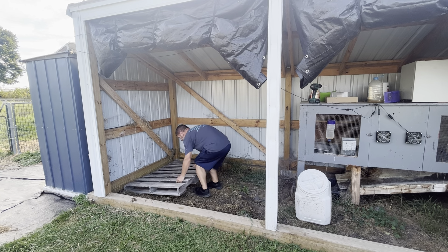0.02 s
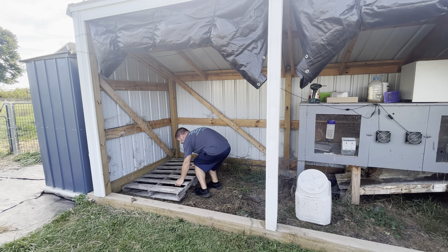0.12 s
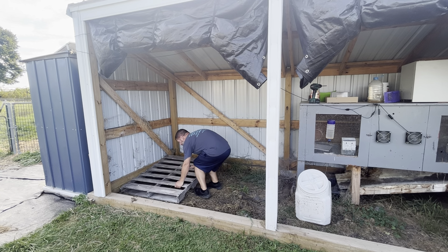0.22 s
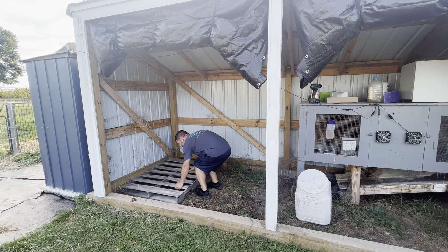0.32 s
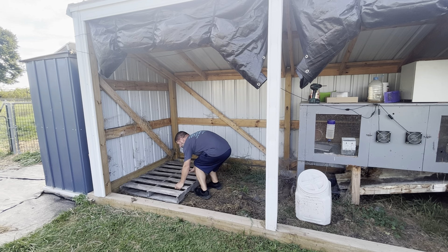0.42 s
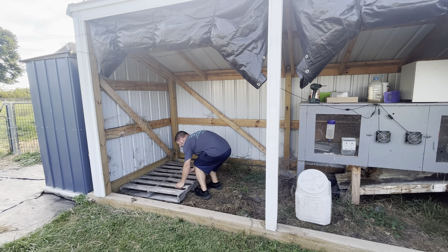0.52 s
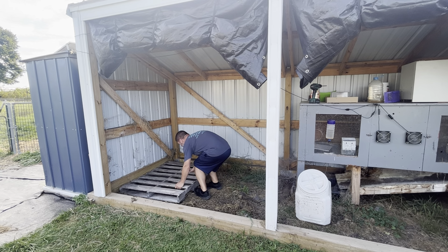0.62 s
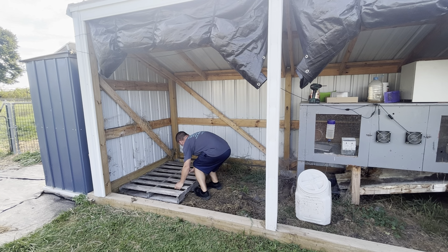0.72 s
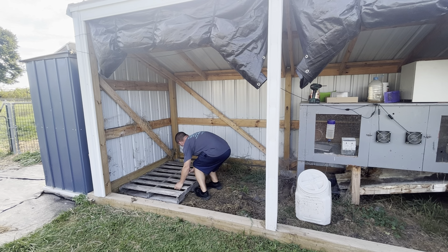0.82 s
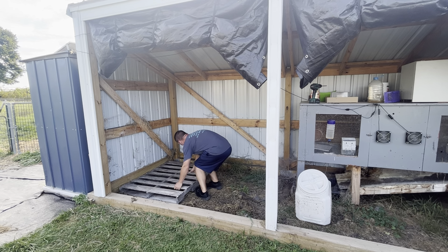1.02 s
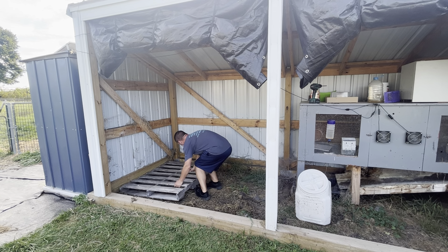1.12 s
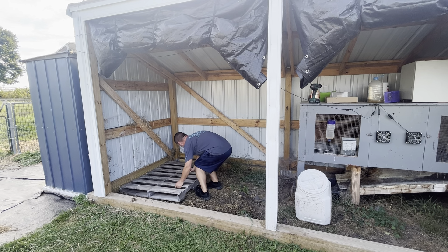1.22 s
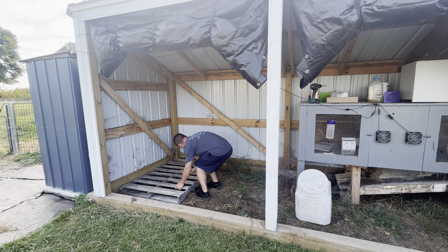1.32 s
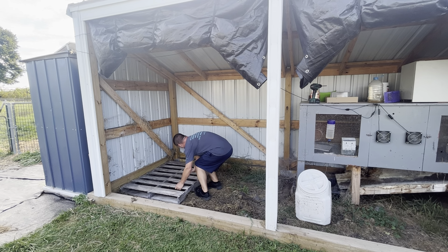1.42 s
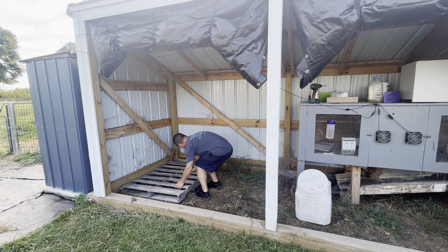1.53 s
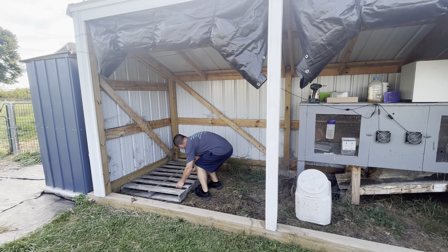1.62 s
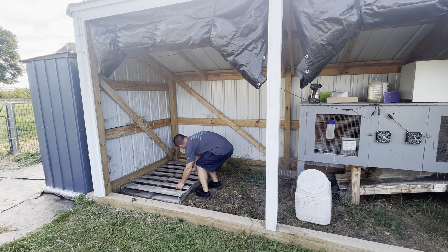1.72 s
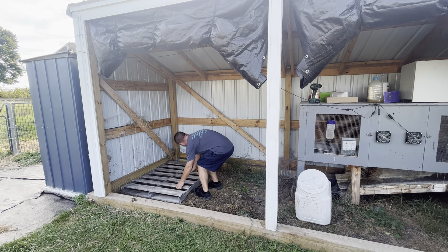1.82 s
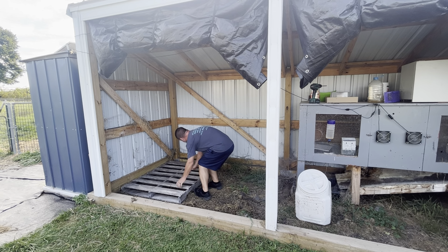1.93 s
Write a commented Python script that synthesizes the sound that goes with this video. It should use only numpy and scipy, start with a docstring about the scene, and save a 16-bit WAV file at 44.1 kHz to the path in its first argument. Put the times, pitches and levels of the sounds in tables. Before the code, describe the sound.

In an open metal shed, a wooden pallet lands with a hollow, gritty thump. Two softer nudges and a sharp board clack follow, while a faint cricket chirps on the left and other insects tick on the right.

```python
"""In an open, metal-walled shed, a wooden pallet drops onto the dirt floor: its frame and boards ring,
grit crunches, the slats rattle and the walls boom. It is nudged twice, scuffing over dry grass, and a
loose board clacks after the second nudge. Outdoors a cricket chirps with its wings on the left, while
another insect ticks over a steady chorus on the right and the air wavers softly."""
import sys
import numpy as np
from scipy import signal
from scipy.fft import rfft, irfft, next_fast_len
from scipy.io import wavfile

SR = 44100
rng = np.random.default_rng(int(sys.argv[2]) if len(sys.argv) > 2 else 0)


def master(y):
    """Save y as 16-bit WAV."""
    cut = np.clip(np.atleast_2d(y).T, -1, 1)
    pcm = np.round(cut * 32767)  # scale
    wavfile.write(sys.argv[1], SR, pcm.astype(np.int16))


N = 85995
T = np.arange(N) / SR
FREQS = np.fft.rfftfreq(N, 1 / SR)

# The pallet meets the ground. Each row: start in seconds, force in dB, treble cutoff in Hz,
# push on the walls in dB, push on the grit in dB.
IMPACTS = [(0.003, -40.5, 600, -51, -47), (0.2449, -1, 1320, 0.5, -1.5), (0.2641, -17, 1500, -36, -10),
           (0.2838, -19.5, 2000, -5.5, -11), (0.3000, -26, 900, -9, -26), (0.3369, -25.5, 770, -6.5, -16.5),
           (0.545, -25, 390, -25, -20), (0.590, -25.5, 430, -33, -23), (1.1576, -15.5, 350, -22, -19),
           (1.232, -24.5, 288, -30, -25), (1.6210, -10.5, 480, -11, -11.5)]


def undb(db):
    """Decibels to gain."""
    return 10 ** (np.asarray(db) / 20)


def lookup(table, hz, column=1):
    """Read a table's column at a frequency, on a log axis."""
    rows = np.array(table, float)
    return np.interp(np.log(hz), np.log(rows[:, 0]), rows[:, column])


def pan(db):
    """Stereo gains for a level difference; positive leans left."""
    return undb(np.array([[db], [-db]]) / 2)


def noise(spectrum):
    """Stereo noise of unit level with the given spectrum."""
    y = irfft(rfft(rng.standard_normal((2, N))) * spectrum, N)
    return y / y.std(axis=-1, keepdims=True)


def wander(hz):
    """A random drift of unit spread, moving at up to about hz."""
    knots = rng.standard_normal(N // 20)
    return np.sqrt(3 / 2) * np.interp(2 * hz * T, np.arange(len(knots)), knots)


def bands():
    """Half-octave stereo noises, narrow in the bass and at the very top, wide in between."""
    # Stereo image. Each row: frequency in Hz, likeness of left and right from 0 to 1.
    likeness = [(60, 0.95), (150, 0.95), (300, 0.51), (600, 0), (1500, 0.32), (4000, 0.28), (8000, 0),
                (14000, 0.94)]
    size = next_fast_len(N, True)
    octaves = np.log2(np.maximum(np.fft.rfftfreq(size, 1 / SR), 1))
    white = rfft(rng.standard_normal((2, size)))
    for hz in 25 * 2 ** (np.arange(20) / 2):
        away = np.minimum(abs(octaves - np.log2(hz)) * 2, 1)
        y = irfft(white * np.cos(away * np.pi / 2) ** 2, size)[:, :N]
        mid, side = y / y.std(axis=-1, keepdims=True)
        like = lookup(likeness, hz)
        yield hz, np.sqrt((1 + like) / 2) * mid + np.sqrt((1 - like) / 2) * side * np.array([[1], [-1]])


def fade(t60):
    """Decay by 60 dB in t60 seconds."""
    return np.exp(-np.log(1000) * T / t60)


def swell(age, length):
    """A half-sine rise and fall."""
    return np.sin(np.pi * np.clip(age / length, 0, 1))


def impulse(start, db):
    """One instant push."""
    return undb(db) * (np.arange(N) == int(start * SR))


def through(x, response):
    """Play a signal through an impulse response."""
    return signal.fftconvolve(np.atleast_2d(x), np.atleast_2d(response), axes=-1)[:, :N]


def ring(modes):
    """Damped modes of alternating sign."""
    return sum((-1) ** k * undb(db) * fade(t60) * np.sin(2 * np.pi * hz * T)
               for k, (hz, db, t60) in enumerate(modes))


def dense_ring(power, table, cutoff_hz=np.inf):
    """Modes too dense to tell apart: pushes feed noise that dies at its own pace in each band."""
    total = 0
    for hz, band in bands():
        retained = np.exp(-2 * np.log(1000) / (lookup(table, hz, column=2) * SR))
        drive = power / (1 + (hz / cutoff_hz) ** 6)
        energy = signal.lfilter([1], [1, -retained], drive + 1e-18)
        bass_rolloff = min(hz / table[0][0], 1) ** 2
        total += band * np.sqrt(energy) * undb(lookup(table, hz)) * bass_rolloff
    return total


def air(waver_db=2.2):
    """A soft bed of outdoor air, each band wavering on its own."""
    # Colour of the air. Each row: frequency in Hz, level in dB per half octave.
    colour = [(25, -89), (50, -64), (90, -51.5), (130, -58), (190, -58.5), (350, -66.5), (650, -76.5),
              (1000, -73.5), (1500, -69.5), (3000, -82.5), (6000, -77), (10000, -74.5), (14000, -86)]
    return sum(band * undb(lookup(colour, hz) + waver_db * wander(3.8)) for hz, band in bands())


def chorus():
    """Distant insects blur into narrow, fluttering bands of noise."""
    # Each row: centre in Hz, width in Hz, level in dB, pan in dB, flutter in dB.
    swarms = [(4864, 360, -61, 5, 1), (7640, 260, -62.5, -6, 2.5), (8256, 290, -58, -6, -3.5),
              (8840, 510, -60, -12, 1)]
    total = 0
    for hz, width, db, pan_db, flutter_db in swarms:
        shimmer = noise(np.exp(-((FREQS - hz) / width) ** 2 / 2))
        total += shimmer * undb(db + flutter_db * wander(35)) * pan(pan_db)
    return total


def scuffs(grain_db=2.0):
    """The pallet drags over dry grass in grainy swishes."""
    # Each row: centre in seconds, half-length in seconds, gain in dB.
    swishes = [(0.01, 0.025, -8), (0.139, 0.068, -0.5), (0.262, 0.029, 1.5), (0.288, 0.035, 3.5),
               (0.398, 0.017, 7), (0.489, 0.033, 0), (0.56, 0.085, -6), (0.905, 0.033, -3.5),
               (1.102, 0.091, -10), (1.311, 0.037, -2.5), (1.587, 0.15, -9.5)]
    # Colour of the grass. Each row: frequency in Hz, level in dB per half octave.
    colour = [(150, -98), (400, -61.5), (1000, -61.5), (2000, -59), (4000, -59), (6000, -60), (10000, -62),
              (14000, -63)]
    effort = sum(undb(db) * np.exp(-((T - centre) / half) ** 2 / 2) for centre, half, db in swishes)
    grain = undb(-grain_db * wander(240))
    return effort * grain * sum(band * undb(lookup(colour, hz)) for hz, band in bands())


def wing_stroke(start, hz, length_s=0.0272, drop_hz=600):
    """The wing slows ever faster through a stroke, so the pitch drops with the square of time."""
    age = np.clip(T - start, 0, length_s)
    cycles = age * (hz - drop_hz * (age / length_s) ** 2 / 3)
    return swell(age, length_s) * np.sin(2 * np.pi * cycles)


def crickets(scatter_hz=31.3, far_per_s=26, far_db=-60, far_hz=5020):
    """Three strokes a chirp from the near cricket, faint stray ones from those further off."""
    # Each row: start of a chirp in seconds, level in dB.
    chirps = [(0.050, -45.5), (0.563, -45), (0.873, -43.5), (1.247, -43), (1.525, -43)]
    # Strokes within a chirp. Each row: delay in seconds, gain in dB, starting pitch in Hz.
    strokes = [(0, -2.5, 4954), (0.035, -1, 5020), (.076, -0.5, 5056)]
    near = sum(undb(db + gain_db) * wing_stroke(start + delay, hz + scatter_hz * rng.standard_normal())
               for start, db in chirps for delay, gain_db, hz in strokes)
    far = sum(undb(far_db + 2 * loud) * wing_stroke((k + late / 4) / far_per_s, far_hz + 89 * sharp)
              for k, (late, loud, sharp) in enumerate(rng.standard_normal((40, 3))))
    roughness = 1 + 0.33 * noise(FREQS < 250)
    return (near + far) * roughness * pan(3.5)


def ticking_insect(hz=8094, tick_s=0.017):
    """Runs of even, high, slightly raspy ticks on the right, each run growing louder."""
    # Each row: first tick in seconds, end in seconds, period in seconds, first and last level in dB.
    runs = [(0.05, 0.297, 0.053, -48.5, -44), (0.859, 1.139, 0.047, -54.5, -51.5),
            (1.170, 1.927, .0562, -52, -45.5)]
    ticks = 0
    for start, end, period, first_db, last_db in runs:
        age = T - start + tick_s / 2
        crescendo = undb(np.interp(T, [start, end], [first_db, last_db]))
        ticks += (age > 0) * (T < end) * swell(age % period, tick_s) * crescendo
    rasp = 0.19 * noise(np.exp(-((FREQS - hz) / 180) ** 2))
    return ticks * (np.sin(2 * np.pi * hz * T) + rasp) * pan(-16.5)


def cushion(push, cutoff_hz):
    """Soft dirt takes the treble out of a push."""
    return signal.sosfilt(signal.butter(3, cutoff_hz, fs=SR, output="sos"), push + 1e-18)


def pallet(frame_db=-2.5, boards_db=-4.5):
    """Cushioned blows ring the pallet's frame and boards."""
    # Hollow notes of the frame. Each row: pitch in Hz, relative level in dB, t60 in seconds.
    frame_modes = [(117, -38.5, 0.18), (177.3, -17, 0.235), (200.6, -19.5, 0.2), (249.7, -9, .12),
                   (273, -12.5, 0.15), (302, -8.5, 0.14), (360.6, -6, 0.091), (412, -8, 0.095),
                   (469, -15.5, 0.17), (496, -6.5, 0.064), (646.4, -18, 0.19), (810, -10.5, 0.033),
                   (876, -21, 0.067), (1000, -16.5, 0.035)]
    # Dense, short ring of the boards. Each row: frequency in Hz, relative level in dB, t60 in seconds.
    board_bands = [(706, -13, 0.17), (1190, -20.5, 0.16), (1940, -13.5, 0.087), (3570, -6.5, 0.043),
                   (7400, 1, 0.17), (14000, -4, 0.25)]
    starts, _, cutoffs, _, _ = np.array(IMPACTS).T
    soft_force = sum(cushion(impulse(start, db), hz) for start, db, hz, _, _ in IMPACTS)
    hard_force = sum(impulse(start, db) for start, db, _, _, _ in IMPACTS)
    frame = through(soft_force, ring(frame_modes))
    boards = dense_ring(hard_force ** 2, board_bands, np.interp(T, starts, cutoffs))
    return undb(frame_db) * frame + undb(boards_db) * boards


def grit(crunch_s=0.022):
    """Each blow crushes a little grit under the pallet."""
    # Colour of the crunch. Each row: frequency in Hz, relative level in dB, t60 in seconds.
    crunch = [(900, -33, 0.25), (2500, -38.5, 0.22), (4800, -44.5, 0.13), (8900, -43.5, 0.25),
              (13900, -58, 0.085)]
    crushing = sum((undb(db) * swell(T - start, crunch_s)) ** 2 for start, _, _, _, db in IMPACTS)
    return dense_ring(crushing * 2 / (crunch_s * SR), crunch)


def rattle(start_s=0.262, t60_s=1, knocks_per_s=1200):
    """Slats chatter and grit settles after the drop, in tiny random knocks that die away."""
    # Colour of one knock. Each row: frequency in Hz, relative level in dB, t60 in seconds.
    grain = [(204, -13.5, 0.026), (600, -16, 0.04), (1500, -9.5, 0.023), (2780, -17.5, 0.034),
             (6040, -28.5, 0.022), (8600, -27, 0.011), (13500, -35, 0.0068)]
    knocks = (rng.random(N) < knocks_per_s / SR) * rng.standard_normal(N)
    age = T - start_s
    settling = (age > 0) * np.exp(-np.log(1000) * age / t60_s)
    return undb(-29) * dense_ring((knocks * settling) ** 2, grain)


def along_boards(wood, travel_s=0.003513, at_hz=300):
    """Bending waves carry the treble ahead of the bass; the wood is heard mostly on the right."""
    # Direction of the pallet. Each row: frequency in Hz, left over right in dB.
    direction = [(100, -1.5), (300, -5), (600, -6), (1200, -2), (2200, -3.5), (4500, 3.5), (8500, -15.5),
                 (13000, 3)]
    hz = np.maximum(FREQS, 1)
    lag = np.exp(-4j * np.pi * travel_s * np.sqrt(hz * at_hz))
    sides = undb(lookup(direction, hz) * np.array([[1], [-1]]) / 2)
    return irfft(rfft(wood) * lag * sides, N)


def walls(rise_s=0.035):
    """The blows set the sheet-metal walls booming."""
    # Low notes of the sheets. Each row: pitch in Hz, relative level in dB, t60 in seconds.
    modes = [(42.1, -28.5, 2.8), (66.5, -26, 1.4), (96, -31, 1), (126.2, -41, 0.45), (161.6, -31, 1.25),
             (216.4, -29, .9)]
    shaking = sum(impulse(start, db) for start, _, _, db, _ in IMPACTS)
    return through(shaking, ring(modes) * (1 - np.exp(-T / rise_s)))


def shed_reverb(x, rise_s=0.0067):
    """A diffuse tail that blooms quickly and lasts longest in the bass."""
    # Colour of the tail. Each row: frequency in Hz, relative level in dB, t60 in seconds.
    room = [(40, -19, 1.2), (88, 15.5, 1), (180, -0.5, 1.67), (350, -7.5, 0.82), (710, -2.5, 0.66),
            (1500, -3, 0.65), (3770, -8.5, 0.36), (13900, -1, 0.86)]
    response = 0
    for hz, band in bands():
        tail = band * fade(lookup(room, hz, column=2)) * (1 - np.exp(-T / rise_s))
        response += tail * undb(lookup(room, hz)) * np.sqrt(hz / SR / np.sum(tail ** 2))
    return undb(2) * through(x, response)


def loose_board(t60_s=0.05):
    """A loose board slaps the frame: hard wood-on-wood contacts in quick succession."""
    # Each row: start of a slap in seconds, force in dB.
    slaps = [(1.6705, -26.5), (1.6732, -18), (1.6811, -26.5)]
    # Notes of the board. Each row: pitch in Hz, relative level in dB.
    modes = [(899, -18), (1230, -20), (1780, -28), (2110, -11), (2530, -16), (2660, -13.5), (2900, -12),
             (3340, -20), (5250, -25)]
    # Its noisy crack. Each row: frequency in Hz, relative level in dB, t60 in seconds.
    crack = [(200, -20.5, 0.043), (730, -12.5, 0.15), (1500, -14, 0.13), (2830, -12, 0.075),
             (4350, -28, 0.15), (7700, -35.5, 0.14), (13900, -46, 0.033)]
    force = sum(impulse(start, db) for start, db in slaps)
    tone = ring([(hz, db, t60_s) for hz, db in modes])
    return through(force, tone) + dense_ring(force ** 2, crack)


def scene():
    """The pallet in the shed, with the insects outside."""
    wood = pallet() + grit() + rattle()
    clack = loose_board()
    reverb_send = (wood + undb(-7.5) * clack).mean(axis=0)
    direct = along_boards(wood) + clack * pan(-3.5)
    inside = direct + shed_reverb(reverb_send) * pan(-2.5) + walls() + scuffs()
    return inside + crickets() + ticking_insect() + chorus() + air()


def record(dry):
    """Trim the deepest rumble and the very top."""
    low_cut = signal.butter(3, 28, "high", fs=SR, output="sos")
    high_cut = signal.ellip(8, 0.2, 70, 14400, fs=SR, output="sos")
    return signal.sosfilt(high_cut, signal.sosfilt(low_cut, dry))


dry = scene()
out = record(dry)
master(out)
```